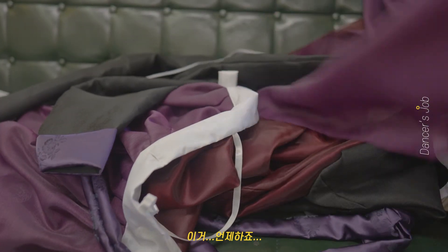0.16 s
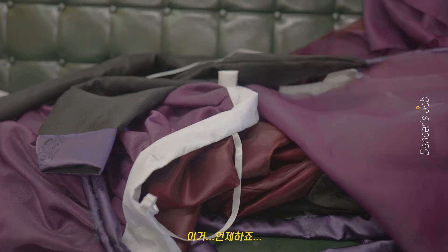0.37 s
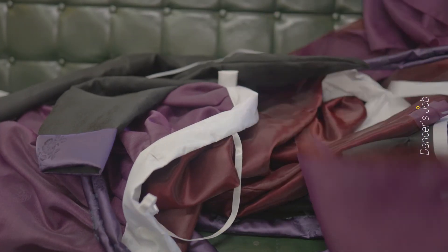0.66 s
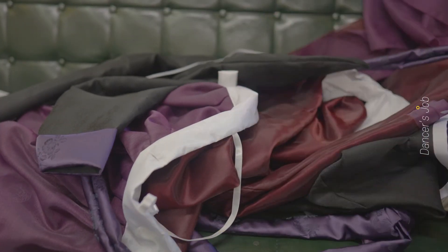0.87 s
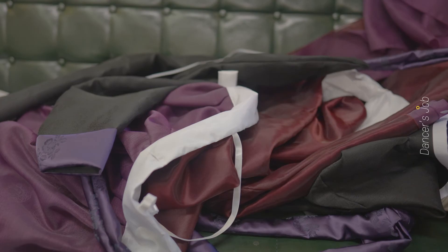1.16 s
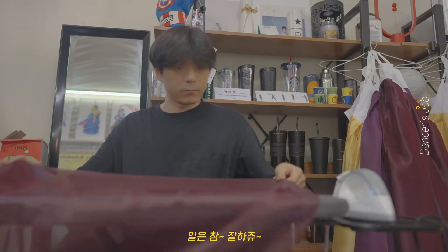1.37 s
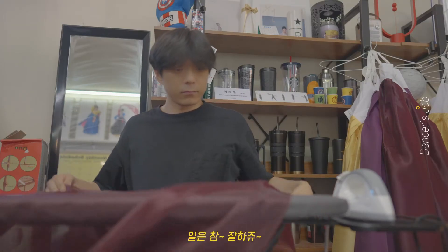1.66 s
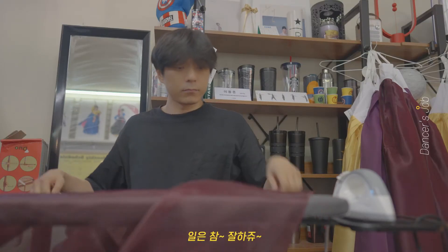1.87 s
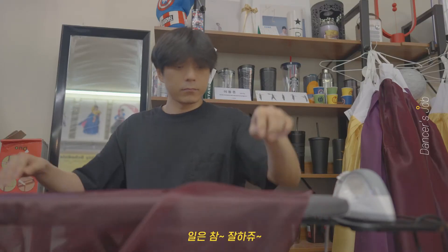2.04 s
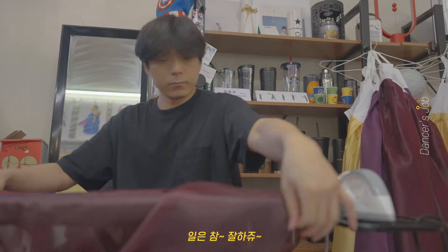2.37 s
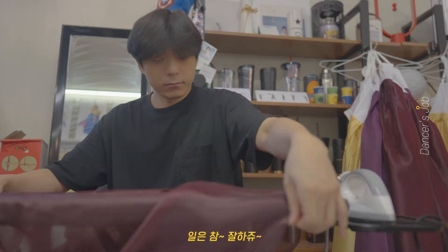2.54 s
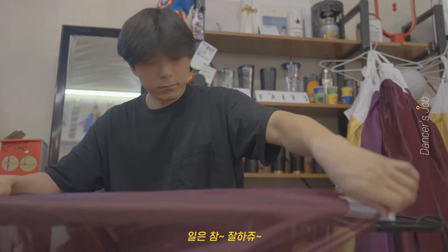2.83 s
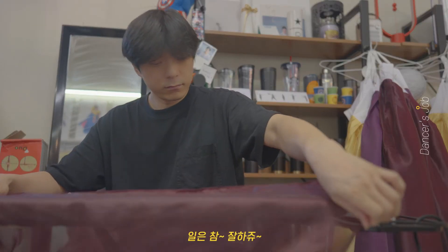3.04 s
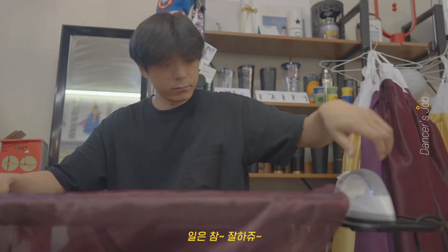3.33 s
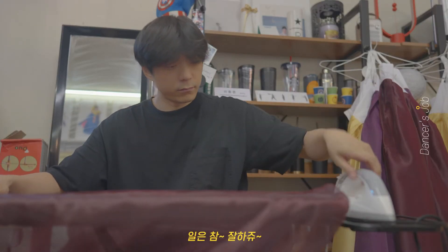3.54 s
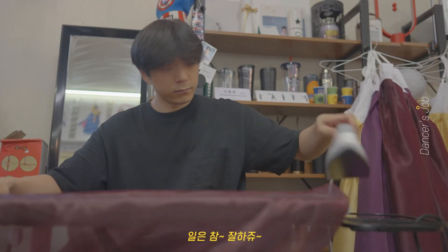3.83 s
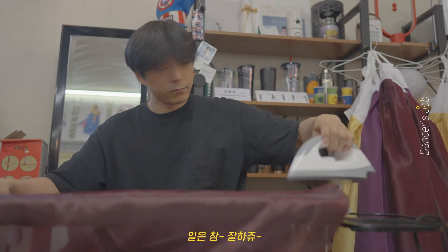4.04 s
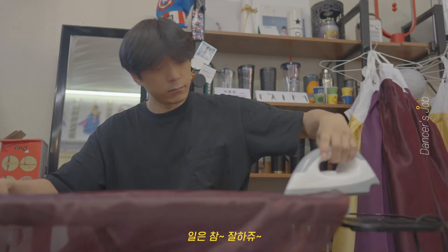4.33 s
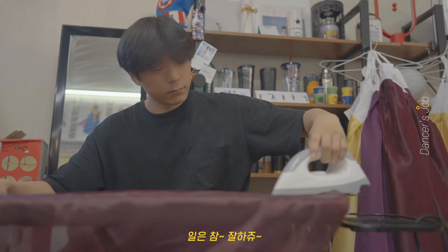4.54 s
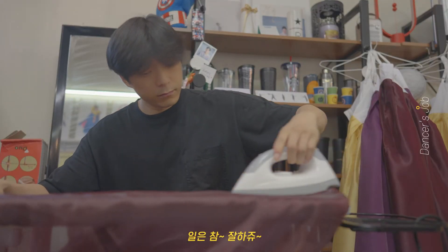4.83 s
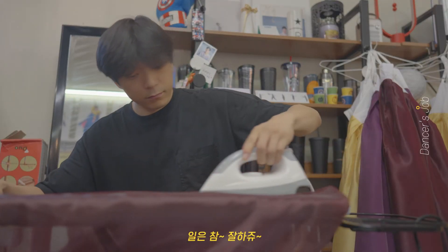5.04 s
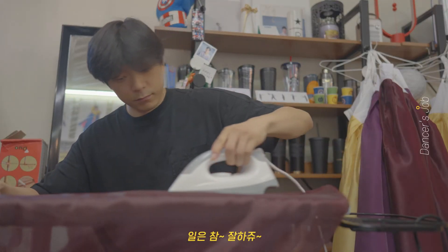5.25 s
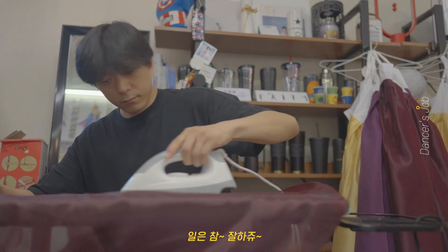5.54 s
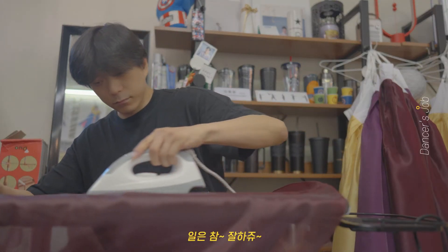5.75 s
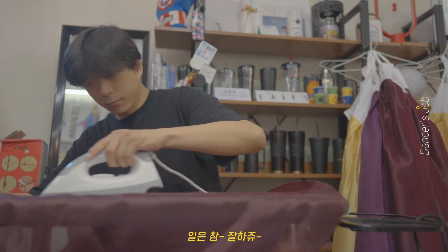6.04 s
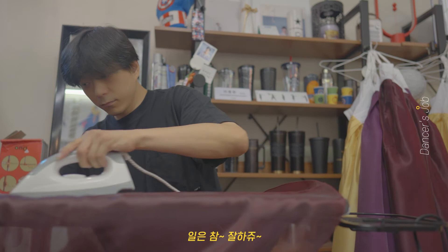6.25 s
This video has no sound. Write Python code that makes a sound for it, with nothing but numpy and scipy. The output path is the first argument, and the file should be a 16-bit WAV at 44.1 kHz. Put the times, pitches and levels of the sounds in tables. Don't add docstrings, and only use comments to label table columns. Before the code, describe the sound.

Slippery silk rustles to the right, building from faint to brisk, before the scene switches to bright, broad hand sweeps over cloth on a board. The sweeps fade, a hard little tap clicks, and cloth brushes again. An iron lightly clinks off a metal rest, lands with a click and dull thud, then slides in a quiet fine hiss. Close stereo pickup, lightly reverberant indoor room, constant fan hiss and whine.

```python
import sys
import numpy as np
from scipy import signal
from scipy.io import wavfile
from scipy.ndimage import uniform_filter1d

SR = 44100
rng = np.random.default_rng(int(sys.argv[2]) if len(sys.argv) > 2 else 0)


def decibels_to_gain(level_db):
    exponent = np.asarray(level_db, float) / 20
    return 10 ** exponent


def transcribe(u):
    v = np.clip(np.atleast_2d(u).T, -1, 1)
    q = np.round(v * 32767).astype(np.int16)
    wavfile.write(sys.argv[1], SR, q)


N = 282240
CUT_S = 1.233

# freq_hz, density_db_per_hz
FAN_FIRST_TONE = [(12, -47), (20, -3), (64, -10.5), (85, -21.5), (226, -7), (363, -11.5), (466, -6),
                  (728, -2), (814, -1), (962, 0.5), (1140, 1), (1270, -1), (15600, -20)]
FAN_TONE = [(12, -42), (20, -3), (55, -32), (166, -18.5), (267, -19.5), (417, -14), (633, -13.5),
            (688, -7.5), (935, -11.5), (1020, -2.5), (1110, -7.5), (2620, -18), (3280, -22.5), (9990, -24),
            (15600, -19.5)]
# freq_hz, likeness_0_1, left_minus_right_db
FAN_FIRST_PORTS = [(60, .998, 0), (150, 1, -1), (350, 1, -1), (700, 0.86, -3), (1400, 0.79, -4.5),
                   (2100, .2, 0), (3800, 0.33, -2), (8000, .2, -4), (14000, .2, 4)]
FAN_PORTS = [(60, .998, 0), (150, 1, 0), (350, 0.91, 2.5), (700, 0.89, 2.5), (1190, 0.18, 5),
             (1990, 0.54, 2.5), (3800, 0.54, 2), (6500, 0.12, -2), (10000, .1, 2), (12500, 0.12, 4),
             (14500, .25, 10.5)]
# freq_hz, width_hz, over_hiss_db
BEARING = [(12860, 40, 5), (13730, 120, 6), (14040, 70, 4), (14265, 60, 10), (14460, 60, 6), (14770, 90, 6),
           (15150, 100, 5), (15345, 70, 8), (15675, 50, 8)]
WHINE_HZ = [28, 118, 142, 171, 703, 761, 820, 881, 1036, 1156, 1270, 1352]
# rms_db, drift_share, left_minus_right_db
WHINE = [(-70, .4, 0), (-74.5, 0.73, 1), (-74, 0.38, -1), (-65, 0.38, 1), (-61.5, 1, 3), (-66, 1, 10),
         (-62.5, 0.54, 5), (-63, 0.73, 4), (-50, 0.14, 8), (-54.5, .45, 14.5), (-56.5, 0.83, 0),
         (-58, 0.27, 12)]

# mode1_hz, mode2_hz, mode3_hz, t60_s
SEAM = (6100, 7300, 9600, .05)
BUTTON = (2480, 4930, 7500, .03)
NAIL = (5400, 3090, 4850, .026)
PAD = (162, 300, 447, .13)
FOLD = (1635, 2400, 3100, .07)
WIRE = (3130, 4350, 2500, .08)
SHELL = (570, 405, 880, .12)
HEEL = (2800, 3500, 13100, .025)
SOLE = (818, 585, 393, .16)
# start_s, peak_db, thing, pitch_factor
TAPS = [(.551, -26, SEAM, 1.1), (.551, -37, PAD, 1.15), (1.245, -38, PAD, 1.02), (2.093, -34, BUTTON, 1.01),
        (2.6412, -13.5, NAIL, 1), (2.675, -27, FOLD, 1.01), (3.054, -25, SEAM, 1.01),
        (3.71, -30, SEAM, 1.43), (3.845, -28, WIRE, 1.01), (3.848, -33.5, SHELL, .99),
        (3.862, -31, WIRE, .82), (3.915, -35, SHELL, .99), (3.943, -32.5, SHELL, 1.03),
        (4.134, -21.5, HEEL, 1.01), (4.184, -39, PAD, .8), (4.2, -31, SOLE, 1), (4.212, -29, SOLE, 1),
        (4.226, -34, FOLD, .94), (4.548, -36, BUTTON, 1.1)]

# peak_s, level_db, rise_20db_s, fall_20db_s, weight_db
DRAGS = [(0.0, -34.5, .1, .27, 3), (.25, -41, .08, .1, 2), (.325, -35.5, .04, .2, -3),
         (.43, -33.5, .2, .3, 0), (.52, -34.5, .15, .1, 4), (.558, -29.5, .02, .13, 3),
         (.685, -26.5, .15, .2, 0), (.8, -31.5, .2, .2, 3), (.88, -27.5, .07, .3, 0),
         (1.025, -21, .16, .25, -1), (1.11, -24, .1, .2, -2), (1.2, -24, .2, .2, -4)]
SWEEPS = [(1.35, -21.5, .115, .2, -4), (1.49, -23, .25, .25, -4), (1.605, -22.5, .15, .14, -1),
          (1.69, -26, .12, .085, 2), (1.9, -37, .3, .13, 4), (1.99, -39, .12, .11, 3),
          (2.19, -50, .1, .1, 0), (2.353, -46, .01, .1, -7), (2.52, -48, .2, .1, 3),
          (2.647, -39, .008, .09, 8), (2.785, -28.5, .085, .1, 2), (2.84, -29.5, .1, .085, 4),
          (2.99, -45, .15, .15, 2), (3.064, -36.5, .025, .1, -3), (3.12, -47, .08, .15, 0)]
LIFT = [(3.79, -39.5, .12, .06, -2), (3.85, -37.5, .055, .12, 2), (3.91, -40, .1, .13, 0),
        (4.09, -48, .06, .04, 0), (4.137, -37.5, .007, .06, -5), (4.22, -46, .08, .08, 4)]
# time_s, level_db
GLIDE = [(4.3, -59), (4.58, -51), (4.67, -45), (4.86, -42), (5.06, -44), (5.28, -40.5), (5.88, -44.5),
         (6.08, -40.5), (6.4, -44)]
# freq_hz, density_db_per_hz
DRAG_TONE = [(290, -53), (500, -23), (594, -20), (639, -28), (748, -12), (877, -19), (1200, -8),
             (1330, -11.5), (1700, -6.5), (3590, -13), (5700, -2), (15600, -4.5)]
SWEEP_TONE = [(760, -33), (1300, -3), (1500, -4), (2160, -2.5), (2840, -0.5), (3720, -6), (5020, -3),
              (6450, -2.5), (8100, -1), (10700, -2.5), (14500, -5), (15600, -10)]
LIFT_TONE = [(250, -17), (500, -1), (1500, 3), (3000, 1.5), (5000, 0), (8000, -5.5), (12000, -2.5),
             (16000, -9)]
GLIDE_TONE = [(500, -33), (1200, -6), (2200, 1), (3800, -2.5), (6000, -3), (9000, -7), (12000, -8.5),
              (16000, -34.5)]
# freq_hz, likeness_0_1, left_minus_right_db
RIGHT_PORTS = [(100, .99, 2), (700, 1, -1), (1400, .3, -9), (2100, 0.5, -12), (3870, 0.85, 2),
               (6200, 0.34, -3), (8000, .2, -9), (12000, 0.1, -4), (16000, 0.1, -2)]
FRONT_PORTS = [(100, .99, 0), (700, 0.94, 2), (1400, 1, -0.13), (2700, 0.6, -1), (3800, 0.049, 2.6),
               (8000, 0.21, -3.3), (14000, 0.31, 1.8)]
# first_s, last_s
SILK_LEAD_S = (.000115, .00016)
# time_s, left_minus_right_db
HAND_PAN = [(1.26, 4), (1.55, .6), (1.75, -1), (2.5, 1.1), (2.8, 1.5), (3.06, -1)]
# time_s, peak_spacing_hz, depth_0_1
BOARD = [
    [(1.25, 4000, .3), (1.33, 4730, .36), (1.42, 5560, .2), (1.5, 3000, .3), (1.6, 2700, 0)],
    [(2.74, 2600, 0), (2.86, 1790, .6), (3.0, 3000, 0), (3.07, 3300, .2)],
]
# freq_hz, width_hz, over_scrape_db
REST = [(405, 47, 9), (566, 44, 6.5), (815, 64, -4), (2080, 170, 4), (3130, 200, -5), (4350, 90, -2),
        (6360, 200, 2.5), (7800, 230, 7.5), (12200, 200, 4)]


def read(points, hz):
    f, *columns = np.transpose(points)
    return [np.interp(np.log(hz + 1), np.log(f + 1), c)[:, None] for c in columns]


def evened(x):
    return x / np.sqrt(np.mean(x ** 2) + 1e-20)


def sides(pan_db):
    return decibels_to_gain(np.array([pan_db / 2, -pan_db / 2]))


def peaks_db(modes, hz):
    return 10 * np.log10(1 + sum(decibels_to_gain(db) ** 2 / (1 + (2 * (hz - f) / width) ** 2) for f, width, db in modes))


def heard(pair, tone, ports, right_lead_s, size, shape_db=lambda hz, t: 0, patchy_db=1.0):
    overlap = size * 3 // 4
    hz, t, (a, b) = signal.stft(pair, SR, nperseg=size, noverlap=overlap)
    like, pan_db = read(ports, hz)
    like = np.clip(like, 0, .999)
    lead_s = np.linspace(*np.broadcast_to(right_lead_s, 2), len(t))
    turn = np.exp(2j * np.pi * hz[:, None] * lead_s)
    left, right = sides(pan_db)
    mid = np.sqrt(left ** 2 + right ** 2 + 2 * left * right * like * turn.real) / 2
    patches = uniform_filter1d(rng.standard_normal(a.shape), 6, 0)
    patches = evened(uniform_filter1d(patches, 20, 1))
    gain = decibels_to_gain(read(tone, hz)[0] + shape_db(hz[:, None], t) + patchy_db * patches) / mid
    at_right = like * turn * a + np.sqrt(1 - like ** 2) * b
    z = gain * np.array([left * a, right * at_right])
    return signal.istft(z, SR, nperseg=size, noverlap=overlap)[1][:, :pair.shape[1]]


def wavering_line(hz, drift):
    t = np.arange(N) / SR
    rate_hz, bandwidth_hz, count = 441, 6, N // 100 + 2
    pole = np.exp(-np.pi * bandwidth_hz / rate_hz)
    slow = signal.lfilter([1], [1, -pole], rng.standard_normal((2, count)))
    re, im = [np.interp(t * rate_hz, np.arange(count), evened(s)) for s in slow]
    wobble = 1.02 + drift * (re + 1j * im)
    return evened((wobble * np.exp(2j * np.pi * (hz * t + rng.random()))).real)


def fan():
    first = np.arange(N) < CUT_S * SR
    before = heard(rng.standard_normal((2, N)), FAN_FIRST_TONE, FAN_FIRST_PORTS, 0.00014, size=1024,
                   patchy_db=1.8)
    after = heard(rng.standard_normal((2, N)), FAN_TONE, FAN_PORTS, -0.00013, size=1024, patchy_db=1.4,
                  shape_db=lambda hz, t: peaks_db(BEARING, hz))
    before *= decibels_to_gain(-40.5) / np.std(before.mean(0))
    after *= decibels_to_gain(-40) / np.std(after.mean(0))
    out = np.where(first, before, after)
    for hz, (db, drift, pan_db) in zip(WHINE_HZ, WHINE):
        first_gain = decibels_to_gain(-5.5) * sides(-.6 * pan_db)[:, None]
        line = wavering_line(hz, drift) * decibels_to_gain(db)
        out += line * np.where(first, first_gain, sides(pan_db)[:, None])
    return out


def room(dry_taps):
    t60_s, level_db, count = .2, -7, SR // 3
    tail = rng.standard_normal((2, count)) * decibels_to_gain(-60 * np.arange(count) / SR / t60_s)
    tail[:, :150] = 0
    tail /= np.linalg.norm(tail[0])
    return dry_taps + decibels_to_gain(level_db) * signal.oaconvolve(dry_taps, tail, axes=1)[:, :N]


def taps():
    out, t = np.zeros((2, N)), np.arange(8000) / SR
    detune = rng.uniform(-0.8, 1, (len(TAPS), 3))
    for (start_s, db, (*hz, t60_s), pitch), twin in zip(TAPS, detune):
        hz = pitch * np.array(hz)
        modes = np.zeros(len(t))
        for f, k, share in zip(hz, twin, (1, .7, .6)):
            pair = np.sin(2 * np.pi * f * t) + 0.27 * np.sin(2 * np.pi * f * (1 + 0.083 * k) * t)
            modes += share * pair * (1 - np.exp(-t * f))
        crack = 0.42 * np.diff(rng.standard_normal(len(t) + 1)) * decibels_to_gain(-60 * t / 0.0037)
        knock = (modes * decibels_to_gain(-60 * t / t60_s) + crack * np.sqrt(hz[0] / 4000)) / 3
        part = out[:, round(start_s * SR):][:, :len(t)]
        part += decibels_to_gain(db) * sides(-0.85)[:, None] * knock
    return room(out)


def strokes(rows, t):
    peak_s, db, rise_s, fall_s, weight_db = np.transpose(rows)[:, :, None]
    away = np.where(t < peak_s, (peak_s - t) / rise_s, (t - peak_s) / fall_s)
    roundness = 1.7
    power = decibels_to_gain(db - 20 * away ** roundness) ** 2 + 1e-12
    return 10 * np.log10(power.sum(0)), (power * weight_db).sum(0) / power.sum(0)


def slips(count, per_s, hiss):
    spread_db = 2.2
    size = decibels_to_gain(spread_db * np.minimum(rng.exponential(1, (2, count)), 3))
    size = size * rng.choice([-1., 1.], (2, count))
    train = evened(size * (rng.random((2, count)) < per_s / SR))
    return evened(train + hiss * rng.standard_normal((2, count)))


def board_comb(hz, t):
    when_s, spacing_hz, depth = np.concatenate(BOARD).T
    depth = np.clip(np.interp(t, when_s, depth), 0, .9)
    return 1 + depth * np.cos(2 * np.pi * hz / np.interp(t, when_s, spacing_hz))


def rub(t, effort, pan_db, tone, ports, right_lead_s, per_s, hiss, flutter_db,
        combed=False, body=(), size=256):
    strength_db, weight_db = effort
    folds = uniform_filter1d(rng.standard_normal(len(t)), 200)
    folds = evened(signal.lfilter([1], [1, -.998], folds))
    drive = slips(len(t), per_s, hiss) * decibels_to_gain(flutter_db * folds)

    def shape_db(hz, frame_s):
        now_s = frame_s + t[0]
        tilt_db = -np.interp(now_s, t, weight_db) * np.log2((hz + 200) / 7000) / 1.66
        comb_db = 10 * np.log10(board_comb(hz, now_s)) if combed else 0
        return tilt_db + comb_db + peaks_db(body, hz)

    sound = heard(drive, tone, ports, right_lead_s, size=size, shape_db=shape_db)
    sound = sound / np.std(sound.mean(0))
    out = np.zeros((2, N))
    out[:, round(t[0] * SR):][:, :len(t)] = sound * decibels_to_gain(strength_db) * sides(pan_db + 0 * t)
    return out


def iron_glide(t):
    effort = np.interp(t, *np.transpose(GLIDE)), 0 * t
    return rub(t, effort, .2, GLIDE_TONE, FRONT_PORTS, -1.5e-5, per_s=7000, hiss=3.6, flutter_db=0.2)


def iron_lift(t):
    return rub(t, strokes(LIFT, t), -2.5, LIFT_TONE, FRONT_PORTS, 1.5e-5, per_s=2500, hiss=1.0,
               flutter_db=1.6, body=REST, size=1024)


def smoothing_hand(t):
    pan_db = np.interp(t, *np.transpose(HAND_PAN))
    return rub(t, strokes(SWEEPS, t), pan_db, SWEEP_TONE, FRONT_PORTS, -0.000013, per_s=9000, hiss=1.04,
               flutter_db=0.74, combed=True)


def silk_drag(t):
    return rub(t, strokes(DRAGS, t), -1.2, DRAG_TONE, RIGHT_PORTS, SILK_LEAD_S, per_s=9000, hiss=1.33,
               flutter_db=0.76)


def scene():
    time = np.arange(N) / SR
    pile, hand, rest, press = np.split(time, np.searchsorted(time, [CUT_S, 3.4, 4.3]))
    mix = fan() + taps()
    mix += silk_drag(pile) + smoothing_hand(hand)
    return mix + iron_lift(rest) + iron_glide(press)


def low_pass(x):
    return signal.sosfilt(signal.butter(12, 17050, fs=SR, output="sos"), x)


def record(dry):
    mono_hz, edge_hz = 120, 15750
    mid, side = dry.mean(0), (dry[0] - dry[1]) / 2
    side = signal.lfilter(*signal.butter(1, mono_hz, "high", fs=SR), side)
    edge = signal.firwin(2047, edge_hz, window=("kaiser", 7), fs=SR)
    mix = signal.oaconvolve(np.array([mid + side, mid - side]), edge[None], "same", axes=1)
    return low_pass(mix)


dry = scene()
out = record(dry)
transcribe(out)
```